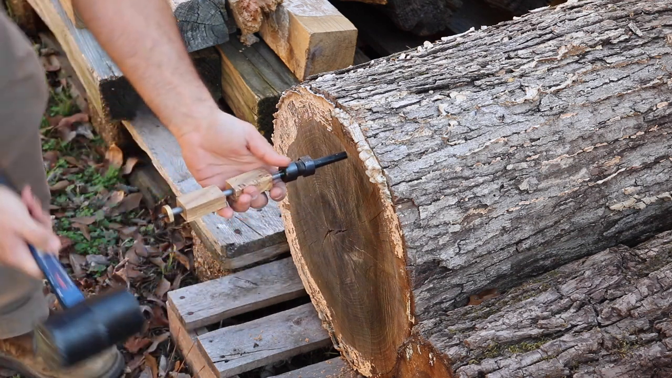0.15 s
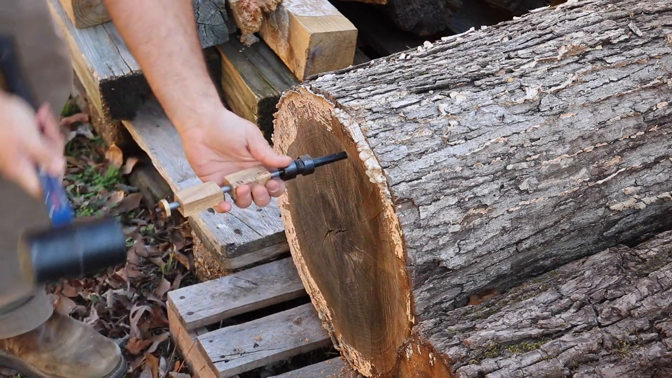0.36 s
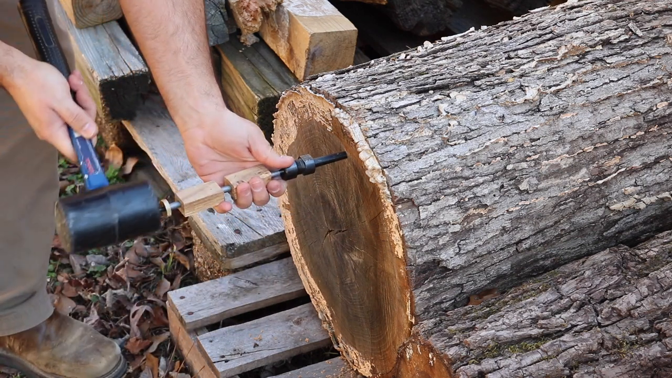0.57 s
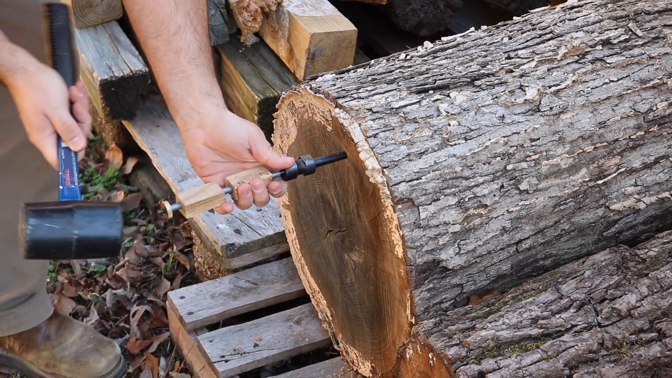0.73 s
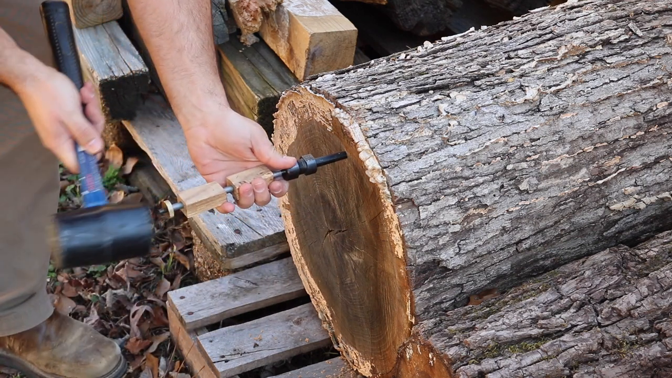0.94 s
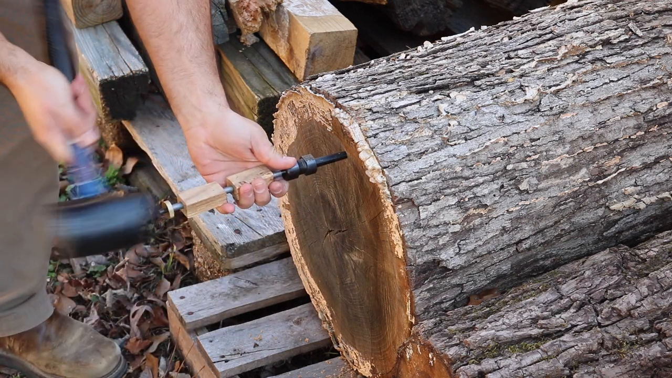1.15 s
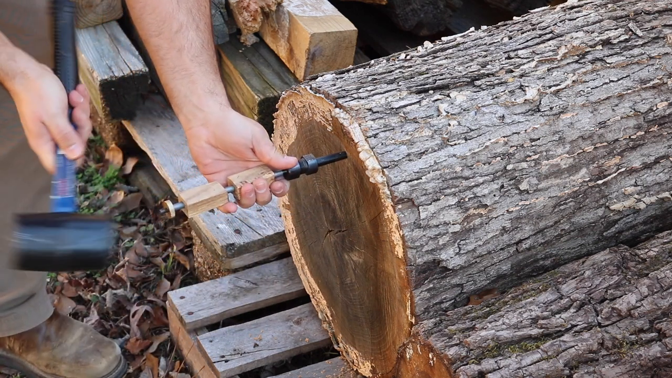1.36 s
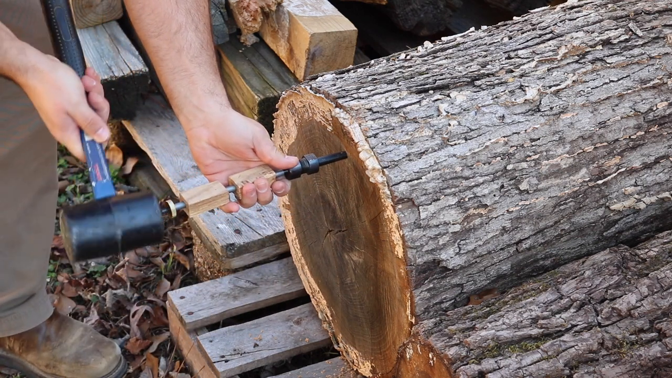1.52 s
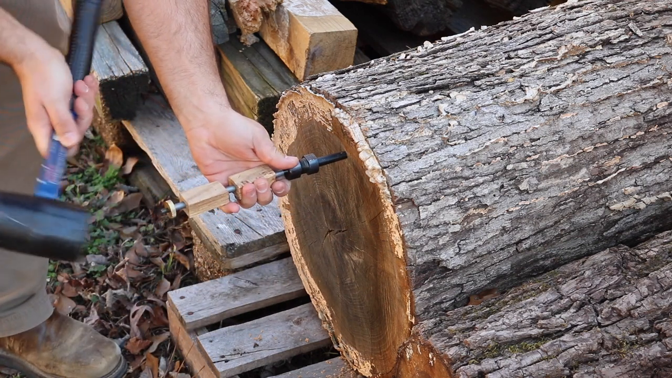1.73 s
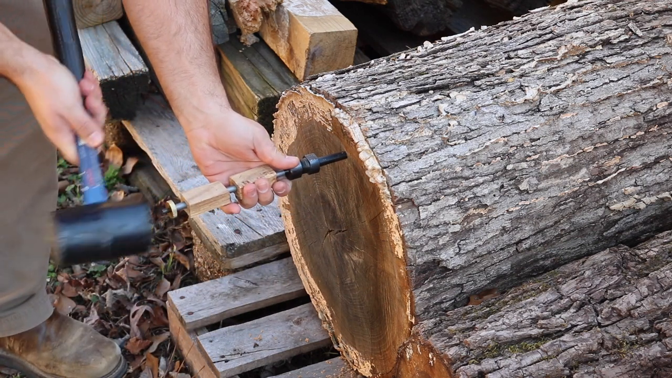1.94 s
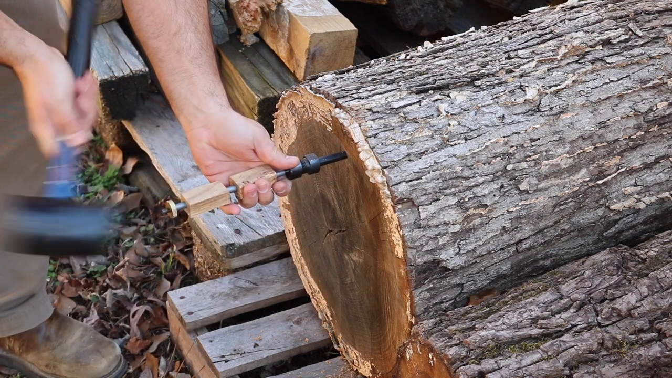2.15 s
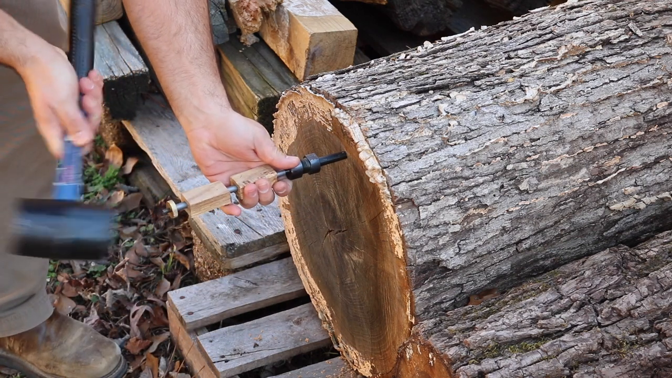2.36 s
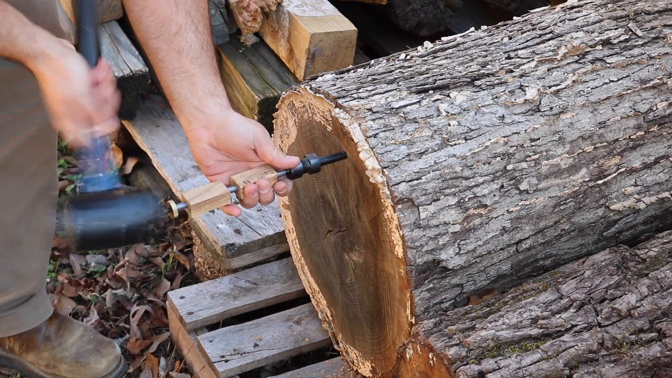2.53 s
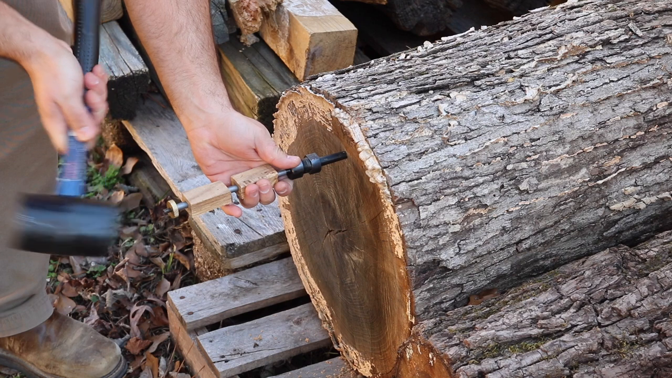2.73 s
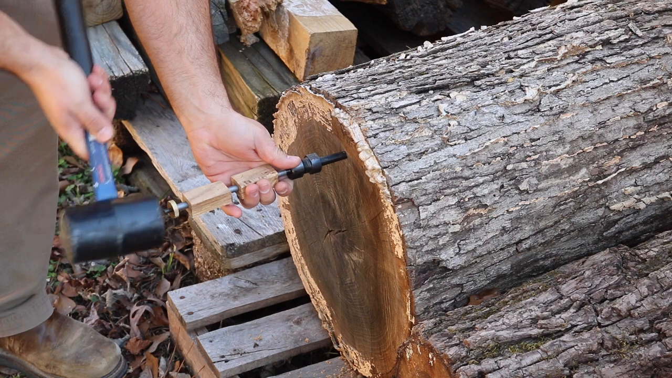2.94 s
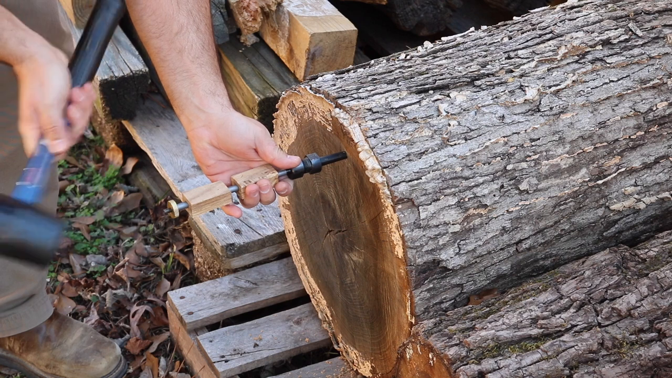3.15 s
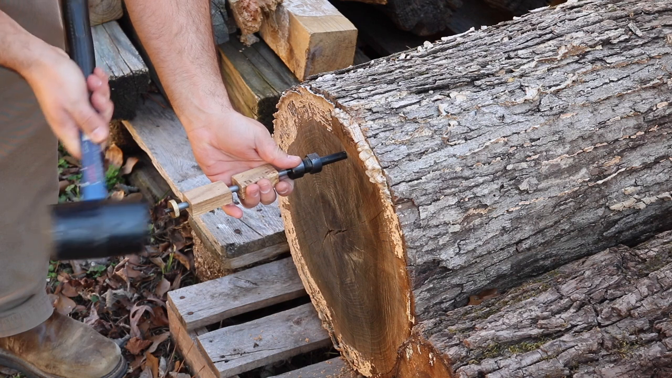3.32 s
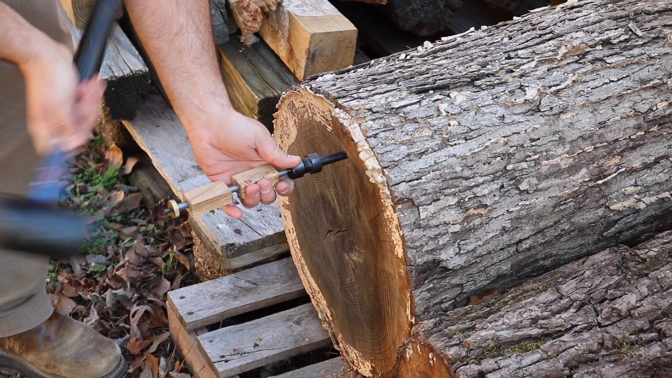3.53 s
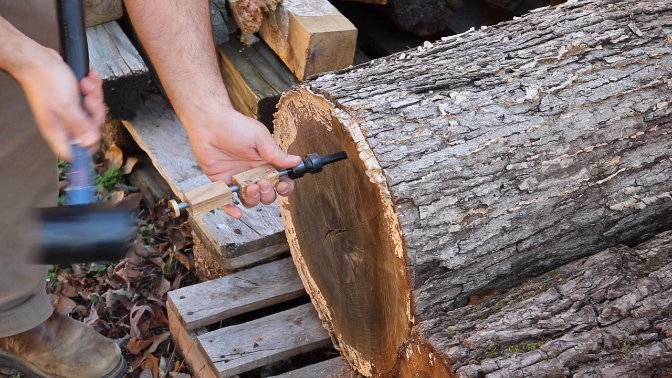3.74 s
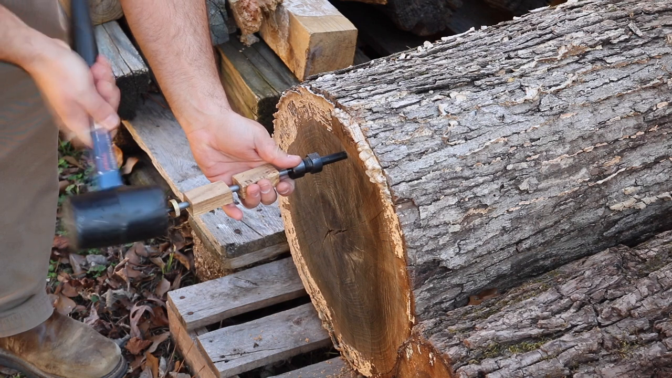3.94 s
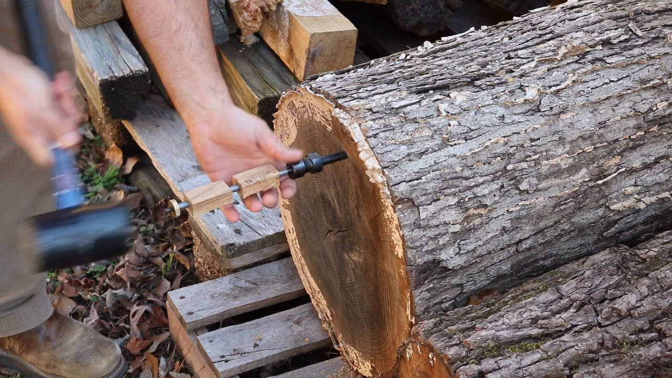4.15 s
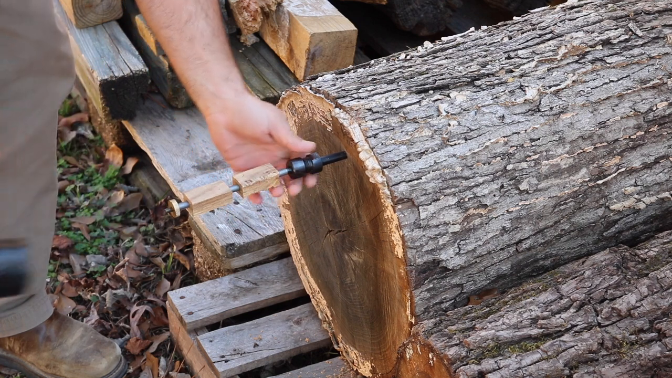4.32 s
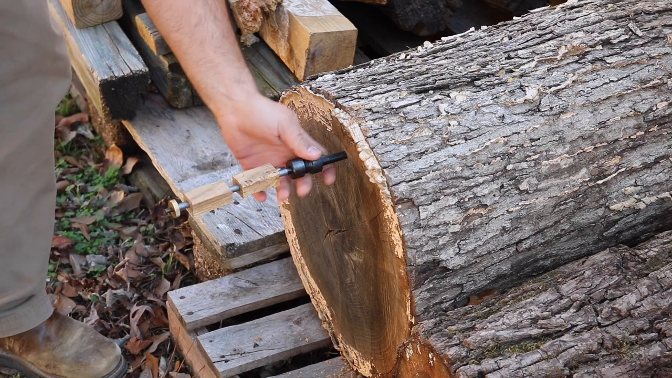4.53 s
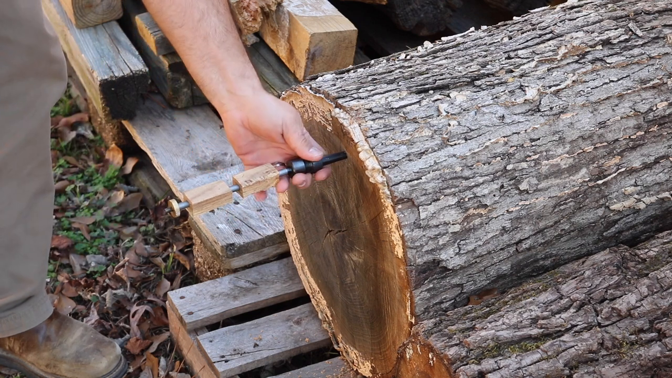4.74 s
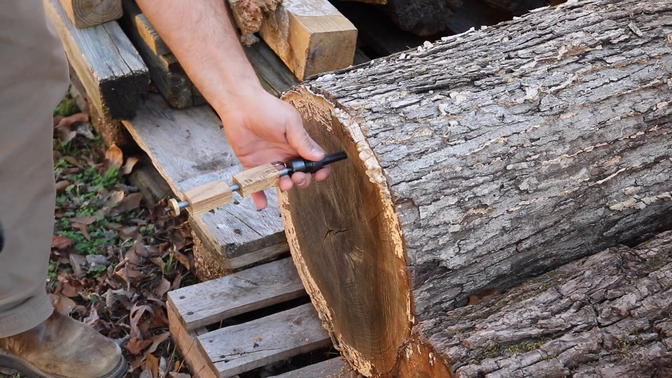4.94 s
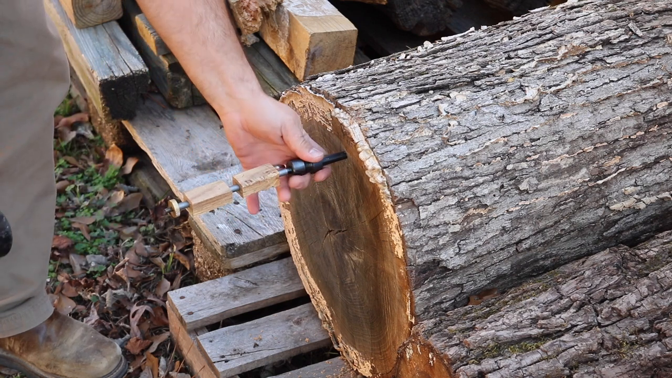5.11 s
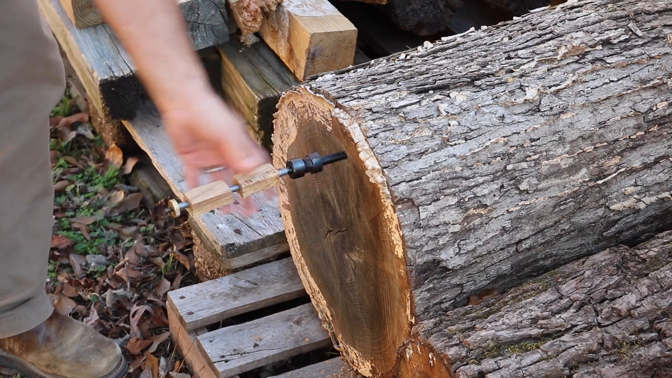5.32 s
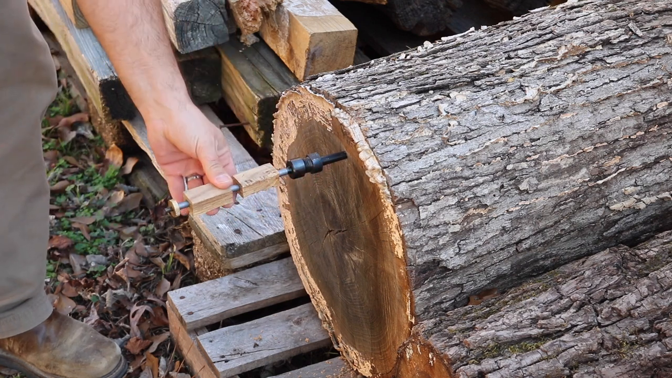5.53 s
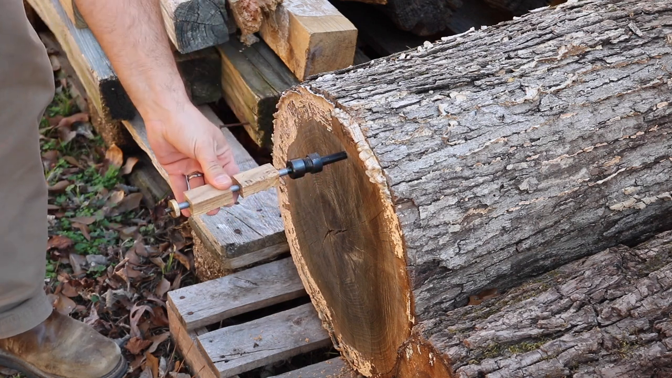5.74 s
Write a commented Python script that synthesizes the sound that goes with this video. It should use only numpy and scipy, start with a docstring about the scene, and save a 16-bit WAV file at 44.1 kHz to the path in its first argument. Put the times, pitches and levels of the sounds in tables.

```python
"""Mallet and mandrel on a log

Outdoors, a rubber mallet drives a steel mandrel into a log with eleven knocks: damped modes under a soft push.
Noise bursts give the woodpile's scatter, a wall's echo and the yard's tail; two low resonances boom.
Grainy friction noise makes a shoe scraping dry leaves and swishing clothes; noise bursts make hand ticks,
shoe bumps and the mallet put down. A thin band of hiss swells once, and a far bird chips in gliding tones."""
import sys
import numpy as np
from scipy import signal
from scipy.fft import rfft, irfft, next_fast_len
from scipy.io import wavfile
from scipy.ndimage import uniform_filter1d

SR = 44100
rng = np.random.default_rng(int(sys.argv[2]) if len(sys.argv) > 2 else 0)


def dump(signal):
    """Clip the signal to [-1, 1] and save it as 16-bit WAV at the path in sys.argv[1]."""
    limited = np.clip(np.atleast_2d(signal).T, -1, 1)
    pcm = np.round(limited * 32767).astype(np.int16)
    wavfile.write(sys.argv[1], SR, pcm)


N = 254898
TIME = np.arange(N) / SR
TOP_HZ = 16000  # upper limit of the sound


def undb(db):
    """Level law: decibels to amplitude gain."""
    return 10 ** (np.asarray(db) / 20)


def unit(x):
    """Normalisation: scale to rms 1."""
    return x / np.sqrt(np.mean(x ** 2))


def fade(t, t60):
    """Exponential damping: 60 dB down after t60 seconds."""
    return np.exp(-np.log(1000) * t / t60)


def swell(s, half_s):
    """Gaussian envelope: a smooth rise and fall around time s."""
    return np.exp(-((TIME - s) / half_s) ** 2)


def add(out, s, x):
    """Superposition: mix x into out from time s on."""
    i = max(int(round(s * SR)), 0)
    out[i:i + len(x)] += x[:len(out) - i]


def colour(x, points, tilt_db=0):
    """Spectral shaping: weight x by (Hz, dB) points and a tilt in dB per octave; rms 1."""
    hz, db = np.transpose(points)
    size = next_fast_len(len(x))
    octave = np.log2(np.maximum(np.fft.rfftfreq(size, 1 / SR), 1))
    gain = undb(np.interp(octave, np.log2(hz), db + tilt_db * np.log2(hz)))
    return unit(irfft(rfft(x, size) * gain, size)[:len(x)])


def band(x, lo_hz, hi_hz, order=2):
    """Band limitation: a causal Butterworth band-pass."""
    edges_hz = [lo_hz, min(hi_hz, SR / 2 - 1000)]
    return signal.sosfilt(signal.butter(order, edges_hz, "band", fs=SR, output="sos"), x)


def grains(size, spread_db):
    """Granular noise: the strength jumps from one tiny grain to the next, giving a dense crackle."""
    count = 16  # samples per grain
    strength = undb(spread_db * rng.standard_normal(size // count + 1))
    return rng.standard_normal(size) * np.repeat(strength, count)[:size]


# Spectrum of still outdoor air. Each row: frequency in Hz, relative spectral level in dB.
AIR = [(12, -37), (20, 0.5), (60, -1), (347, -19), (459, -16.5), (558, -16), (607, -28.5), (802, -22.5),
       (949, -23), (1260, -26.5), (2320, -32.5), (2530, -27), (6180, -34), (11800, -36.5), (16000, -35.5)]
AIR_DB = -61  # rms level before the rumble swells


def air(gust_db=2.5):
    """Broadband turbulence: a steady far hiss over a low rumble that swells with the breeze."""
    noise = colour(rng.standard_normal(N), AIR)
    rumble = band(noise, 12.7, 100, order=1)
    gust = np.interp(TIME, np.linspace(0, TIME[-1], 40), rng.standard_normal(40))
    return undb(AIR_DB) * (noise + rumble * (undb(gust_db * gust) - 1))


def thin_hiss(peak_s=3.554, half_s=0.19, level_db=-61, lo_hz=5400, hi_hz=8630):
    """Band-limited noise: a narrow band of treble swells and fades once."""
    hiss = unit(band(rng.standard_normal(N), lo_hz, hi_hz, order=3))
    return undb(level_db) * swell(peak_s, half_s) * hiss


# Chips of a far bird. Each row: start in seconds, level in dB, nominal top pitch in Hz.
CHIPS = [(2.986, -60, 6040), (4.441, -59, 5710), (5.531, -55, 6040)]


def bird(start_hz=3300, glide_s=0.01, length_s=0.044, rasp=0.097, trees_t60=0.65, trees_db=-3):
    """Frequency modulation: a raspy upward glide, smeared by multiple scattering in the trees."""
    out, t = np.zeros(N), TIME[:SR // 3]
    for s, db, top_hz in CHIPS:
        waver = unit(uniform_filter1d(rng.standard_normal(len(t)), size=20))
        glide_hz = top_hz + (start_hz - top_hz) * np.exp(-t / glide_s)
        hz = glide_hz * (1 + rasp * waver)
        envelope = np.sqrt(np.abs(np.sin(np.pi * np.minimum(t / length_s, 1))))
        chip = np.sin(2 * np.pi * np.cumsum(hz) / SR) * envelope
        trees = rng.standard_normal(len(t)) * fade(t, trees_t60)
        echo = signal.fftconvolve(chip, trees / np.linalg.norm(trees))[:len(t)]
        add(out, s, undb(db) * band(chip + undb(trees_db) * echo, 2500, 5940, order=6))
    return out


# Colour of a rustle of leaves or cloth. Each row: frequency in Hz, relative level in dB.
RUSTLE_COLOUR = [(100, -10), (350, -8), (600, -10.5), (900, -7), (1600, -6), (2500, -1.5), (3400, -0.5),
                 (4700, -7), (8000, -8.5), (12000, -14), (16000, -19)]


def rustle(crackle_db, bright_db):
    """Dry friction: many tiny slips come in uneven bunches; rms 1."""
    bunching = .4  # spread of the bunches against that of the grains
    smooth = unit(uniform_filter1d(rng.standard_normal(N), size=200))
    bunches = undb(bunching * crackle_db * smooth)
    return colour(grains(N, crackle_db) * bunches, RUSTLE_COLOUR, bright_db)


# Swishes of the clothes as the arms move.
# Each row: peak time in seconds, half length in seconds, level in dB, brightness in dB per octave.
SWISHES = [(0.009, 0.058, -55.5, -2.5), (0.677, 0.26, -62.5, -1.5), (1.216, 0.14, -63, -0.5),
           (1.446, 0.067, -50, -1.5), (2.002, 0.023, -52, 0.5), (2.374, 0.06, -46, -0.5),
           (2.883, 0.063, -58.5, -3), (4.115, 0.03, -54.5, -1), (4.632, 0.078, -64.5, -2),
           (4.838, 0.044, -53.5, -.5), (4.967, 0.11, -57, -1), (5.263, 0.093, -61.5, -3)]


def clothes(crackle_db=4.0, stir_db=-70, stir_tilt_db=-1.0, stir_crackle_db=6.5):
    """Sliding friction: cloth stirs faintly all the time and swishes with the larger movements."""
    out = undb(stir_db) * rustle(stir_crackle_db, stir_tilt_db)
    for s, half_s, db, bright_db in SWISHES:
        out += undb(db) * swell(s, half_s) * rustle(crackle_db, bright_db)
    return out


# A shoe scrapes, then slides through dry leaves: two lists of envelope points.
# Each row: time in seconds, level of the rustle in dB relative to scrape_db.
SHUFFLE = [
    [(0.11, -62), (0.116, -40), (0.128, -34.5), (0.17, -26), (0.21, -49.5)],
    [(0.27, -47.5), (0.306, -40.5), (0.318, -52), (0.484, -36.5), (0.54, -47)],
]


def shuffle(scrape_db=-.5, scrape_crackle_db=3.15, scrape_tilt_db=0., release_s=0.032,
            leaves_s=0.34, leaves_half_s=0.11, leaves_db=-47, leaves_crackle_db=11.0, leaves_tilt_db=-.5):
    """Sliding friction: fine-grained noise for the scraping shoe, coarser for the leaves under it."""
    s, db = np.vstack(SHUFFLE).T
    moving = np.interp(TIME, [s[0] - release_s, s[0], s[-1], s[-1] + release_s], [0, 1, 1, 0])
    scrape = undb(scrape_db + np.interp(TIME, s, db)) * rustle(scrape_crackle_db, scrape_tilt_db)
    leaves = undb(leaves_db) * swell(leaves_s, leaves_half_s) * rustle(leaves_crackle_db, leaves_tilt_db)
    return moving * scrape + leaves


def thud(db, hz, t60):
    """Heavily damped impact: a broad two-octave noise burst, as on soft ground."""
    t = TIME[:SR // 4]
    return undb(db) * unit(band(rng.standard_normal(len(t)), hz / 2, hz * 2)) * fade(t, t60)


# Soft bumps of the shoes. Each row: start in seconds, level in dB, centre in Hz, 60 dB decay in seconds.
BUMPS = [(0.031, -49, 1070, 0.037), (3.145, -55, 650, 0.23), (4.14, -54, 847, 0.55)]
# the mallet is put down and settles in a few contacts, each lower and longer than the one before
DROP_S, DROP_DB, DROP_HZ, DROP_T60_S = 5.104, -49, 950, 0.079
SETTLE_GAP_S, SETTLE_PITCH_RATIO, SETTLE_T60_RATIO = 0.033, 0.38, 1.05


def bumps(count=4):
    """Repeated soft impacts: the shoes shift now and then; at the end the mallet settles on the ground."""
    out = np.zeros(N)
    for s, db, hz, t60 in BUMPS:
        add(out, s, thud(db, hz, t60))
    for k in range(count):
        hz = DROP_HZ * SETTLE_PITCH_RATIO ** k
        t60 = DROP_T60_S * SETTLE_T60_RATIO ** k
        add(out, DROP_S + k * SETTLE_GAP_S, thud(DROP_DB, hz, t60))
    return out


# Small snaps of leaves and ticks of the hand on the tool.
# Each row: start in seconds, overall level in dB, centre of the ring in Hz, relative level of the snap in dB.
TICKS = [(0.2533, -20, 1860, -10), (0.3655, -26.5, 2580, -4.5), (0.392, -31, 2800, -7),
         (0.4366, -27, 3100, -4), (0.6452, -51, 2650, 9.5), (1.9797, -39, 3620, 2.5),
         (2.0724, -39, 2490, -15), (2.7326, -44, 1530, 0.5), (3.4186, -38, 2100, -1.5),
         (4.0979, -33.5, 3120, -3.5), (4.1408, -45, 3110, 3.5), (4.3033, -42, 2500, -4.5),
         (4.979, -37.5, 3300, -10), (5.169, -32, 2780, -17), (5.444, -41.5, 3430, -12.5)]


def ticks(ring_db=-5, ring_t60=0.021, snap_db=-4, snap_t60=0.0085):
    """Impulsive contact: a short woody resonance under a bright, faster-decaying snap."""
    out, t = np.zeros(N), TIME[:SR // 10]
    for s, db, hz, treble_db in TICKS:
        noise = rng.standard_normal((2, len(t)))
        ring = undb(ring_db) * unit(band(noise[0], hz * 0.79, hz * 1.21)) * fade(t, ring_t60)
        snap = undb(snap_db + treble_db) * unit(band(noise[1], 2600, 13700)) * fade(t, snap_t60)
        add(out, s, undb(db) * (ring + snap))
    return out


def echoes(x, pile_db=-22, pile_s=0.011, pile_t60=0.085, wall_db=-24, wall_s=0.054, wall_t60=0.04):
    """Delayed reflection: convolution with scatter from the woodpile, then one rough echo from a wall."""
    t = TIME[:SR // 4]
    response = np.zeros(len(t))
    for s, level_db, decay in ((pile_s, pile_db, pile_t60), (wall_s, wall_db, wall_t60)):
        shape = fade(t, decay)
        noise = band(rng.standard_normal(len(t)), 950, 7800, order=1)
        add(response, s, undb(level_db) * noise * shape / np.linalg.norm(shape))
    return signal.fftconvolve(x, response)[:N]


# The yard's diffuse answer to a knock.
# Each row: band centre in Hz, level against the blow in dB, 60 dB decay in seconds.
YARD = [(98.5, -32.5, 0.86), (185, -27.5, 0.54), (418, -26.5, 0.24), (900, -38, 0.72), (1780, -44, 1),
        (3060, -42, 0.85), (5360, -49.5, 0.73), (10900, -67, 0.81)]
# Low hollow resonances of the woodpile.
# Each row: frequency in Hz, level against the blow in dB, 60 dB decay in seconds.
BOOM = [(96.6, -21, 0.46), (172.8, -21.5, 0.53)]


def yard(build_s=0.035, boom_build_s=0.05):
    """Diffuse reverberation: noise bands decay at their own rates while the woodpile's resonances boom."""
    out, t = np.zeros(N), TIME[:SR]
    hz, db, t60 = np.transpose(YARD)
    edges = np.r_[hz[0] * .75, np.sqrt(hz[1:] * hz[:-1]), TOP_HZ]
    boom = sum(undb(level_db) * fade(t, decay) * np.sin(2 * np.pi * f * t) for f, level_db, decay in BOOM)
    boom = boom * (1 - np.exp(-t / boom_build_s))
    for lo, hi, level_db, decay in zip(edges, edges[1:], db, t60):
        shape = fade(t, decay) * (1 - np.exp(-(t / build_s) ** 2))
        tails = np.zeros(N)
        for s, blow_db, *_ in BLOWS:
            add(tails, s, undb(blow_db + level_db) * shape)
        out += tails * unit(band(rng.standard_normal(N), lo, hi, order=3))
    for s, blow_db, *_ in BLOWS:
        add(out, s, undb(blow_db) * boom)
    return out


def thock(level_db=-4, lo_hz=1400, hi_hz=2600, rise_s=0.0024, t60=0.026):
    """High modal density: the log's many close, damped modes blur into a short woody noise."""
    out, t = np.zeros(N), TIME[:SR // 10]
    for s, db, *_ in BLOWS:
        blur = unit(band(rng.standard_normal(len(t)), lo_hz, hi_hz))
        add(out, s, undb(db + level_db) * blur * fade(t, t60) * (1 - np.exp(-(t / rise_s) ** 2)))
    return out


# the tip bites at BITE_S and sinks steadily for SINK_S, ending this far (0-1) from loose to seated
BITE_S, SINK_S, FULL_SEAT = .85, 2.26, 0.84


def seating(s, loose, seated):
    """Changing boundary condition: a property moves from loose towards seated as the mandrel sinks."""
    return loose + (seated - loose) * FULL_SEAT * np.clip((s - BITE_S) / SINK_S, 0, 1)


# Modes of mallet, mandrel and log together. Each row: nominal frequency in Hz, 60 dB decay in seconds,
# level in dB with the mandrel loose, level in dB once seated.
KNOCK_MODES = [(110, 0.2, -12.5, -40), (184.6, 0.097, -12, -11.5), (205.4, 0.12, -12, -10.5),
               (231.4, 0.051, -7.5, 1.9), (300, 0.005, 1.5, -17), (419, .039, -4, -6),
               (577, 0.041, -1.1, -3.5), (704, 0.055, -1.5, -19), (794, 0.057, -6.5, 3.5),
               (897, 0.06, -8.5, -1), (994, 0.043, -10, -10), (1099, 0.046, -13, -3),
               (1163, 0.04, -9.5, 1.1), (1320, 0.013, 1, -8.5), (1476, 0.026, 1, -8), (1664, 0.02, 1, -2.5),
               (1960, 0.029, -13.5, 5.5), (2134, 0.021, 1.5, 1.5), (2433, 0.01, 6, 6),
               (2609, 0.048, -9, -17), (2830, 0.0087, 14, 3), (3058, 0.02, -2, -9.5), (3143, 0.011, 11, 4),
               (3270, 0.018, 3.2, -5), (3585, 0.0082, 14, 1), (4100, 0.029, -12.5, -18.5),
               (4325, 0.013, -9, -5.5), (5345, 0.005, 7, 6), (6120, 0.016, -19, -5)]
# Mallet blows. Each row: start in seconds, level in dB, hardness in dB per octave,
# frequency in Hz that the contact spot alters, size of that boost or cut in dB.
BLOWS = [(0.5475, -30, 1.5, 1250, 14), (0.8984, -28, 0.8, 690, 7.5), (1.2425, -22, 1, 2520, -4),
         (1.5821, -18.5, 1.7, 1200, 6), (1.9336, -16, 1.9, 1460, 0.5), (2.2698, -16, 0.73, 1400, 10.5),
         (2.6109, -16, 1.5, 1410, 8), (2.951, -15.5, 2, 2270, 5), (3.3019, -15, 1.0, 930, 3),
         (3.653, -14, 2, 640, -5.3), (4.0196, -13.5, 2.5, 580, -3.5)]
# Colour of the cracking fibres. Each row: frequency in Hz, relative level in dB before the tilt.
CRACK = [(300, -34), (1500, 5), (3500, -6), (4700, 4.5), (5700, 4.5), (6800, 10.5), (8500, 5), (11000, 0.5),
         (14000, 2.5), (16000, -14)]
# crack with the mandrel loose and seated: level against the blow (dB), brightness (dB per octave)
CRACK_LOOSE_DB, CRACK_SEATED_DB = -4, -19.5
CRACK_LOOSE_TILT_DB, CRACK_SEATED_TILT_DB = -6.5, 8


def knocks(rise_s=0.0033, touch_s=0.00043, scatter_db=2.16, crack_lag_s=0.001115,
           crack_t60=.017, splinter_db=-27, splinter_t60=0.22):
    """Modal excitation: blows swell damped modes, rebalanced by seating; fibres crack after the bite."""
    spot_octaves, detune = .2, .003  # width of the contact colour; relative spread of the pitches
    out, t = np.zeros(N), TIME[:SR // 4]
    hz, t60, loose_db, seated_db = np.transpose(KNOCK_MODES)[:, :, None]
    # rubber yields, so the push builds over a few milliseconds
    push = (1 - np.exp(-t / rise_s)) * (1 - np.exp(-(t / touch_s) ** 2))
    for s, db, hard_db, spot_hz, spot_db in BLOWS:
        chance = rng.standard_normal((2, len(hz), 1))
        mode_db = seating(s, loose_db, seated_db) + scatter_db * chance[0]
        # how hard and where the mallet lands decides which modes it feeds
        spot = np.exp(-(np.log2(hz / spot_hz) / spot_octaves) ** 2)
        contact_db = hard_db * np.log2(hz / 1000) + spot_db * spot
        tones = np.sin(2 * np.pi * hz * (1 + detune * chance[1]) * t)
        ring = undb(mode_db + contact_db) * fade(t, t60) * tones
        add(out, s, undb(db) * ring.sum(axis=0) * push)
        if s > BITE_S:
            # the deeper the mandrel sits, the fainter and thinner the crack
            tilt_db = seating(s, CRACK_LOOSE_TILT_DB, CRACK_SEATED_TILT_DB)
            crack = colour(grains(len(t), 1.5), CRACK, tilt_db)
            crack = crack * (fade(t, crack_t60) + undb(splinter_db) * fade(t, splinter_t60))
            crack_db = db + seating(s, CRACK_LOOSE_DB, CRACK_SEATED_DB)
            add(out, s + crack_lag_s, undb(crack_db) * crack)
    return out


def scene(width_db=-43, hiss_db=-77):
    """Mid-side superposition: both channels almost alike, with faint quadrature sound and hiss as side."""
    struck = knocks() + thock() + ticks() + bumps()
    mid = struck + echoes(struck) + yard() + shuffle() + clothes() + thin_hiss() + bird() + air()
    quadrature = signal.hilbert(mid, next_fast_len(N))[:N].imag
    side = undb(width_db) * quadrature + undb(hiss_db) * rng.standard_normal(N)
    return np.array([mid + side, mid - side])


def record(dry):
    """Band limitation: a steep elliptic low-pass removes what lies above TOP_HZ."""
    return signal.sosfilt(signal.ellip(10, .1, 80, TOP_HZ, fs=SR, output="sos"), dry)


dry = scene()
out = record(dry)
dump(out)
```